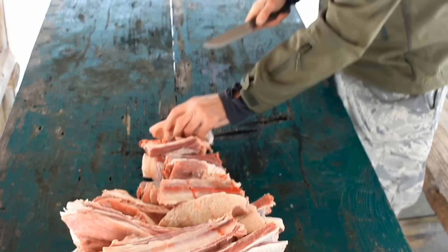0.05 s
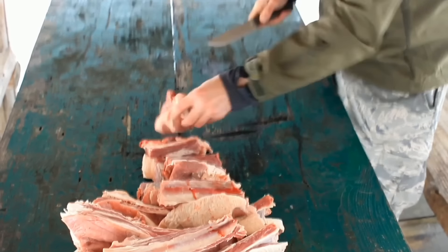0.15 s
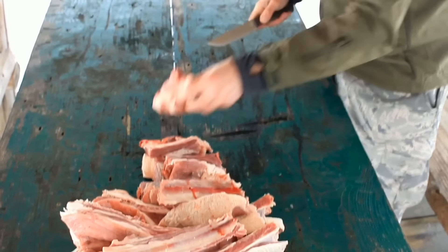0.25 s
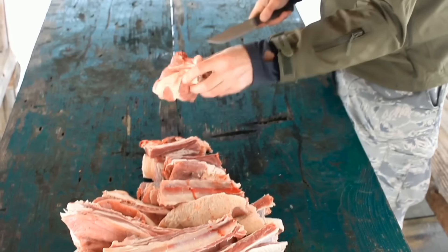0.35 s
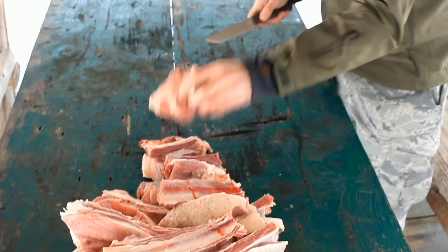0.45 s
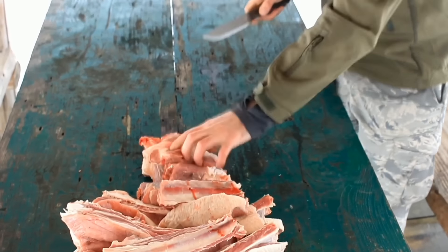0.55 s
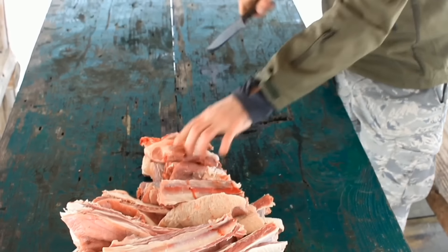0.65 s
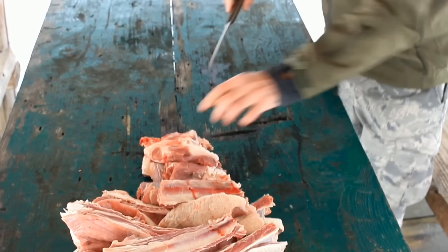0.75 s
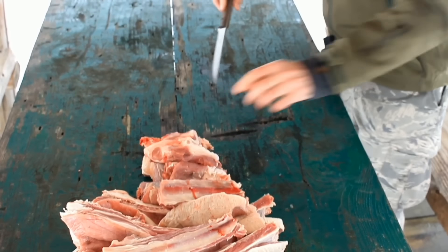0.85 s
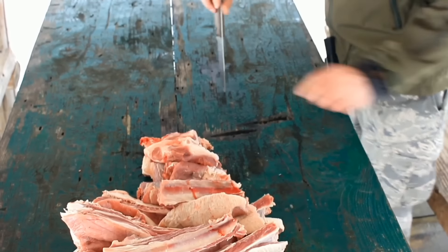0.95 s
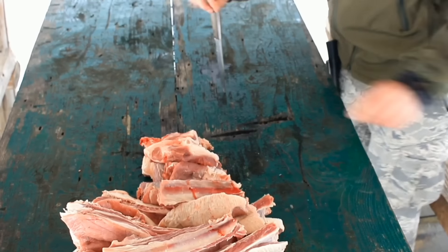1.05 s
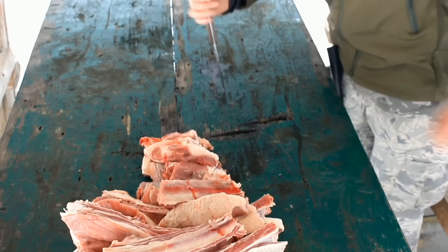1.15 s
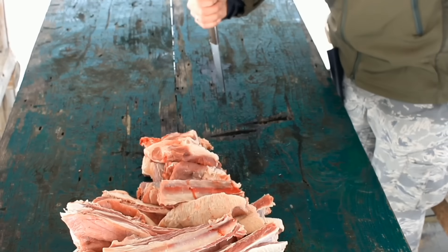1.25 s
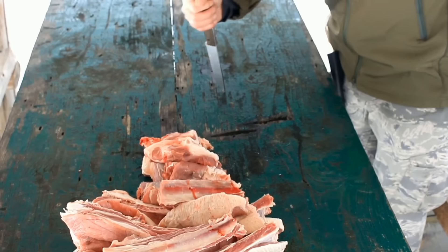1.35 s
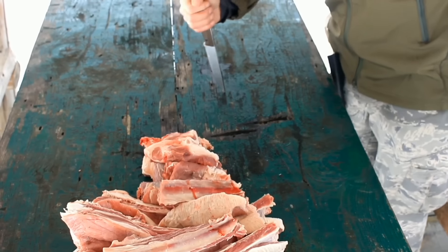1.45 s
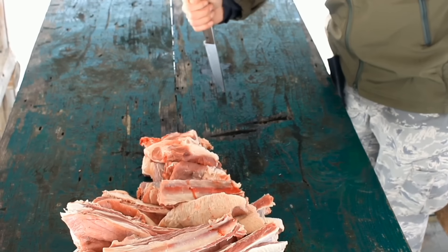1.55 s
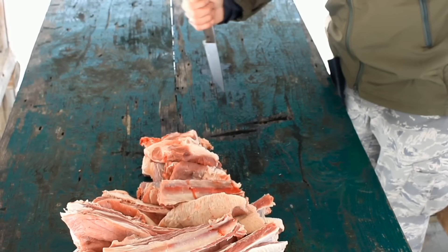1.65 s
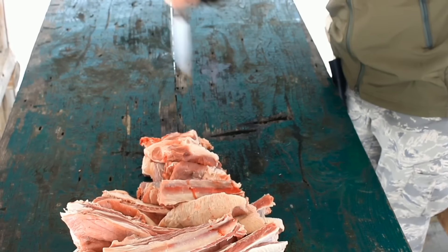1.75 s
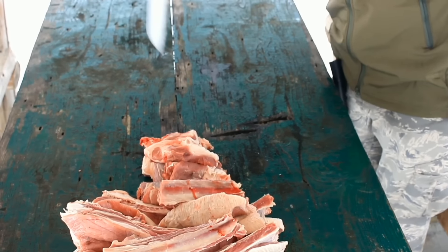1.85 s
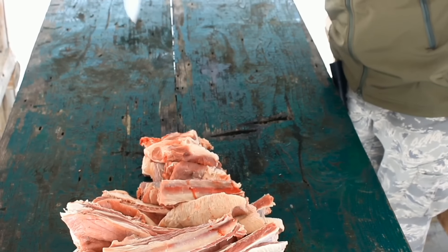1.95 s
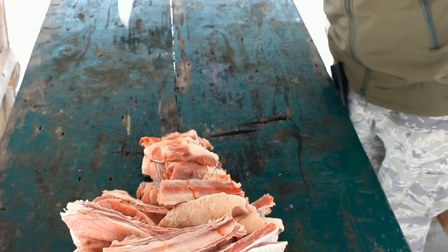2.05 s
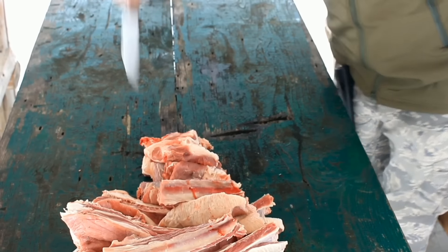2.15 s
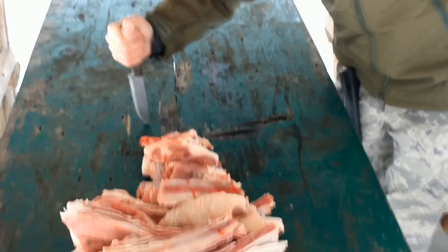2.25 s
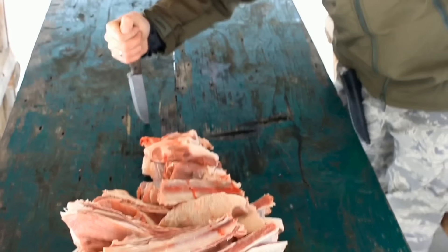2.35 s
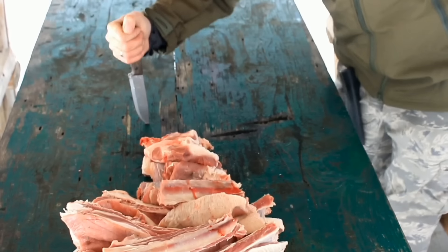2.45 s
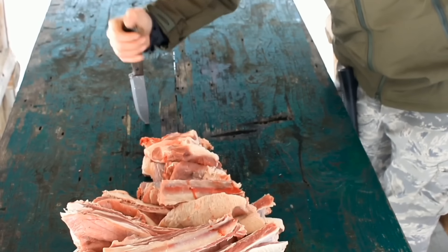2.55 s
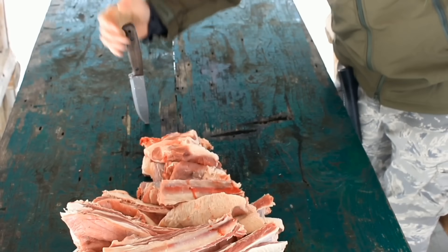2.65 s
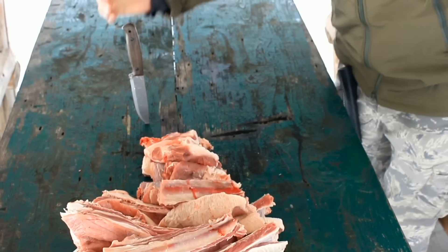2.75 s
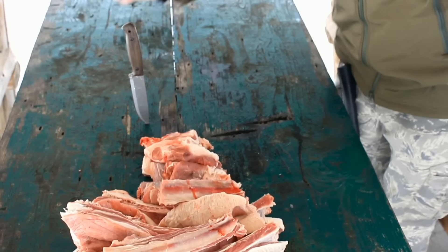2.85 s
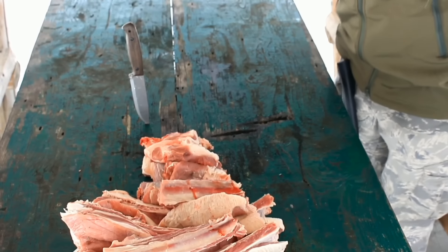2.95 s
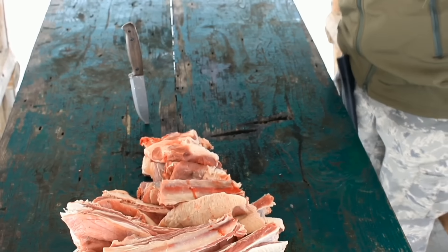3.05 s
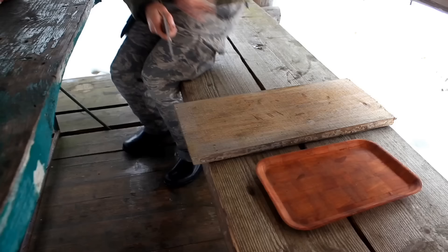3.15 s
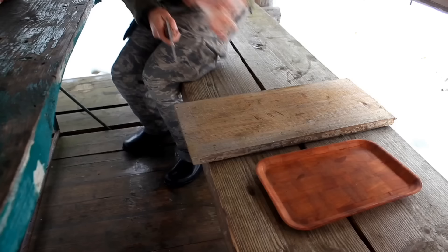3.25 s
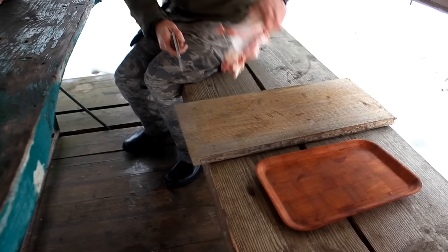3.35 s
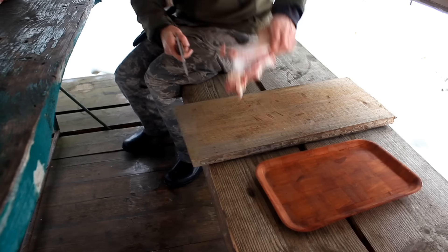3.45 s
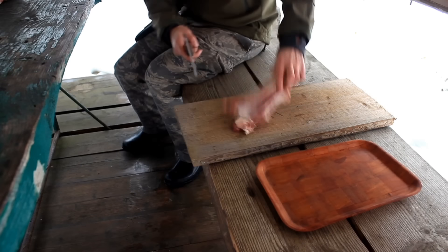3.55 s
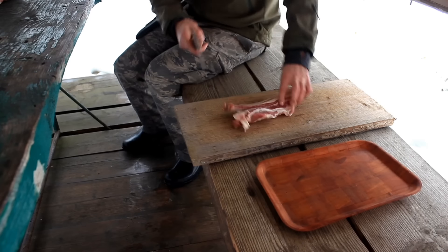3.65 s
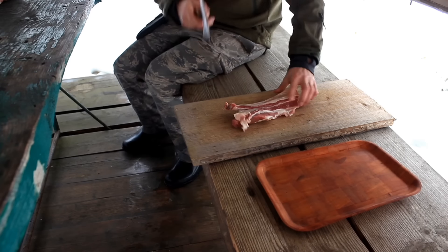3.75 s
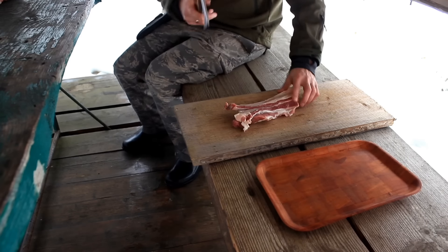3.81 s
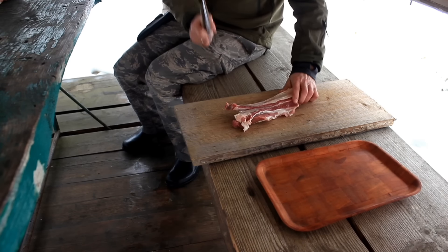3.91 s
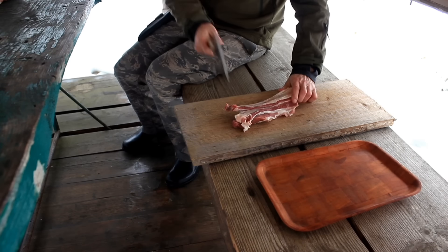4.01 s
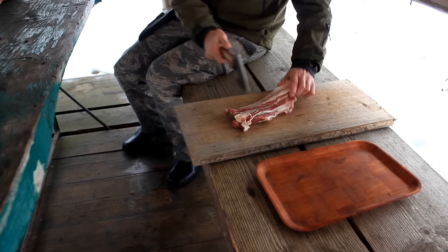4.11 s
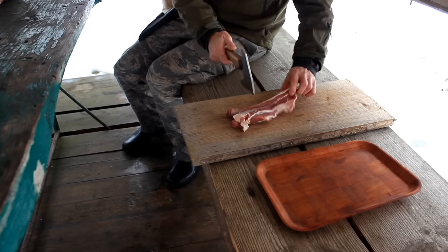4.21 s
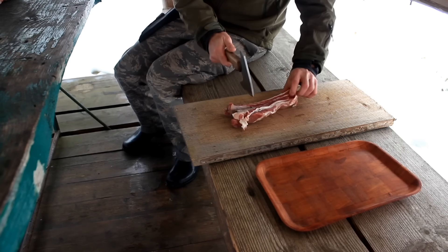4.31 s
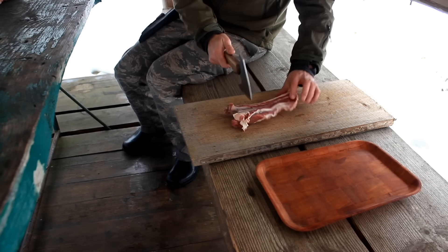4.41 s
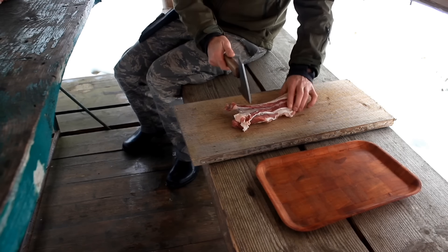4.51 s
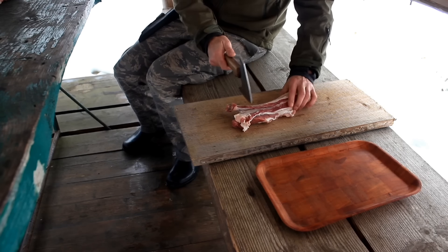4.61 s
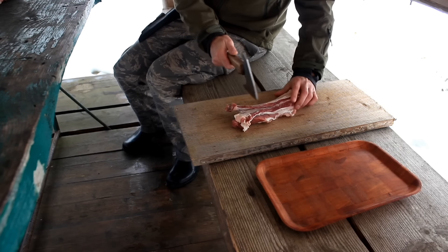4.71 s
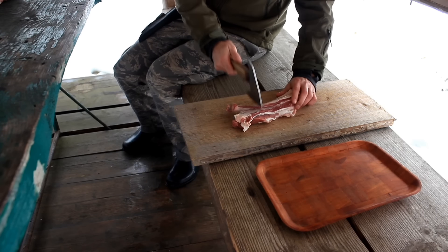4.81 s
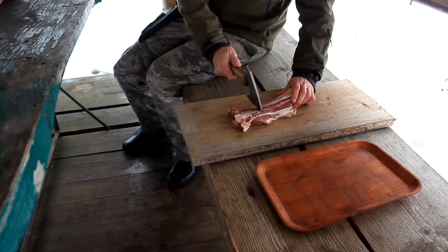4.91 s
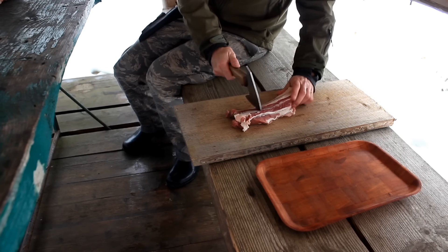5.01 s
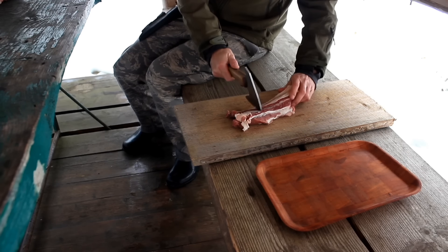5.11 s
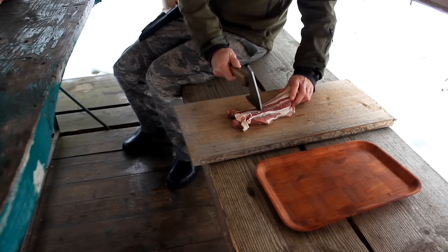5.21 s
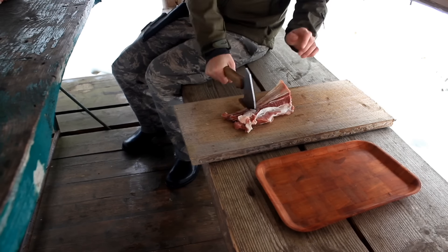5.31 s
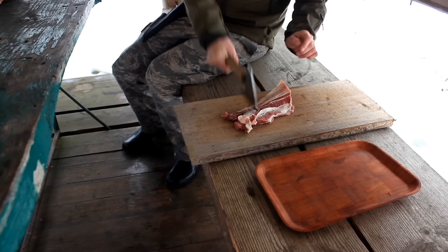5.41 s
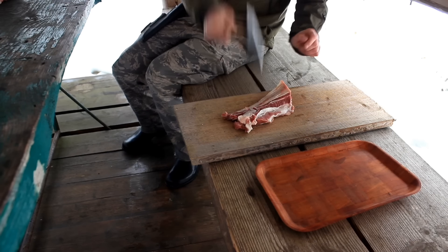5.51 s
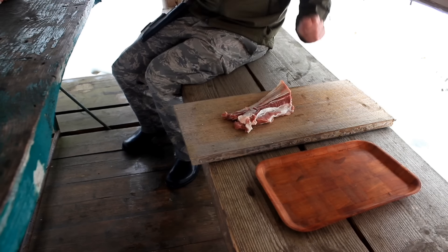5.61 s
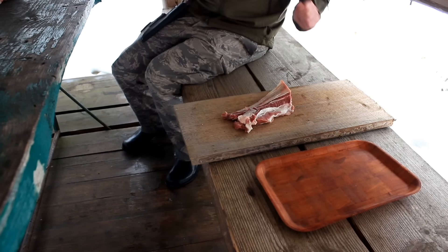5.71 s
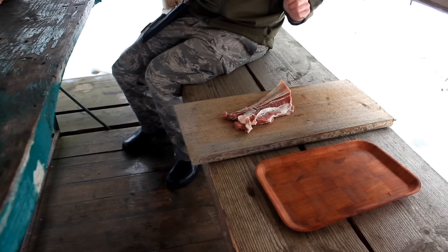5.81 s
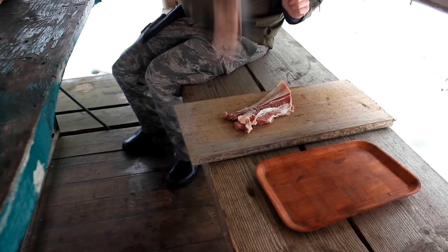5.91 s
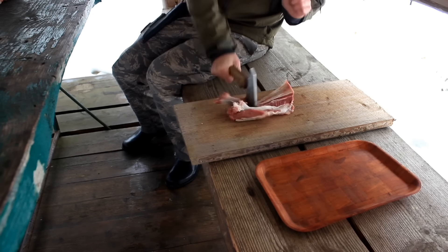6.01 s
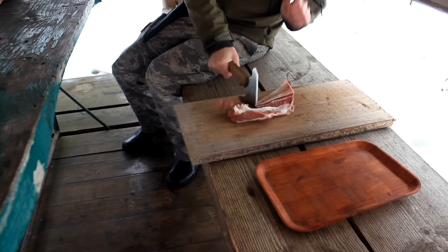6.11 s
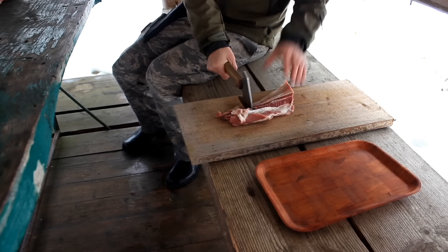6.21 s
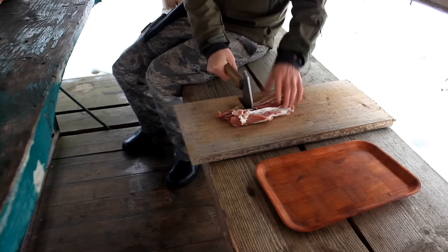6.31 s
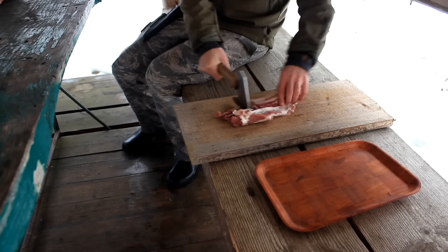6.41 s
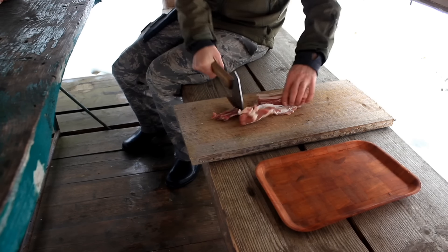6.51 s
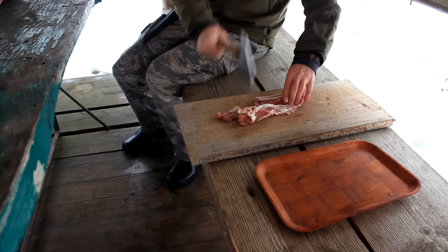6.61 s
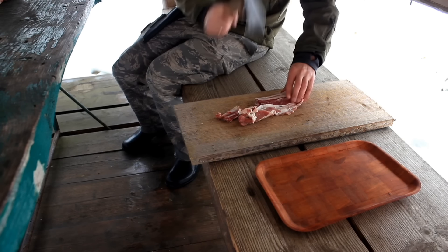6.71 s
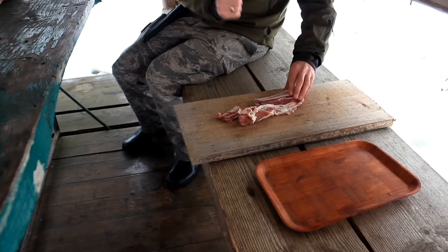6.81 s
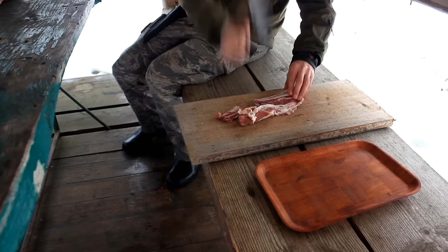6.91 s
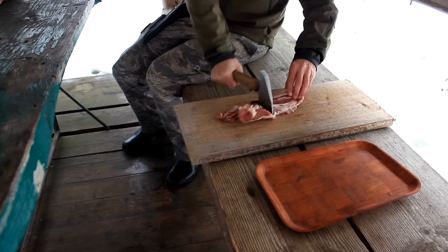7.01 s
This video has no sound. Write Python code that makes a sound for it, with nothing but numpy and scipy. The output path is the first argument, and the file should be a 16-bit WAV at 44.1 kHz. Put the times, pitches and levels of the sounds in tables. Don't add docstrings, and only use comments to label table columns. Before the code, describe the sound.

Close sounds in an open wooden shelter under soft rain. Meat drops and hand bumps thud through a plank table, then a knife stabs in with a heavy, low, woody bang and leaves a faint hum. The scene cuts to a quieter bench: wet meat slaps and slides on a board, and a hatchet delivers two sharp, distorted chops. The small microphone's hiss ducks after blows and creeps back.

```python
import sys
import numpy as np
from scipy import signal
from scipy.fft import rfft, irfft
from scipy.io import wavfile

SR = 44100
rng = np.random.default_rng(int(sys.argv[2]) if len(sys.argv) > 2 else 0)


def volts_from_decibels(level):
    exponent = np.asarray(level, float) / 20
    return 10 ** exponent


def digitize_waveform(pressure):
    field = np.atleast_2d(pressure).T
    bounded = np.clip(field, -1, 1)
    quanta = np.round(bounded * 32767).astype(np.int16)
    wavfile.write(sys.argv[1], SR, quanta)


N = 311346
T = np.arange(N) / SR
SLOW_T = T[::32]
BENCH_FROM_S = 3.15

# frequency in Hz, level in dB per Hz.
ROAR_COLOUR = [(120, -24), (200, -8), (330, -6), (550, -2.5), (860, -1.5), (1150, -3.5), (1450, -.2),
               (1750, -3.5), (2150, -6), (2650, -3.5), (3200, -10), (3900, -12), (4500, -22), (7000, -40)]
# frequency in Hz, level in dB per Hz.
PATTER_COLOUR = [(1500, -6), (3500, .2), (5000, -1.5), (6300, -.5), (8000, -5), (11000, -8.5), (15800, -12)]
# frequency in Hz, level in dB per Hz.
MICROPHONE_NOISE_COLOUR = [(50, 4.5), (400, 3.5), (800, -1.5), (1300, -11), (3500, -10), (5000, -2.5),
                           (7000, .2), (15800, .2)]
# level in dB, treble against level in dB.
RAIN_AT_TABLE, RAIN_AT_BENCH = (-30.3, -17.7), (-39.7, -13)
# start in seconds, level the hiss sinks to in dB, seconds it stays down.
HISS_SINKS = [
    (2.236, -44, .1),
    (5.232, -65.5, .16),
    (5.94, -66, .25),
    (6.96, -68, .13),
]
# middle in seconds, half length in seconds, level in dB,
# treble in dB.
RUSTLES = [(1.08, .15, .2, 1.5), (1.9, .3, 1.2, .1), (2.5, .05, 2.5, .1), (3.11, .08, -4, .3),
           (3.18, .06, 1.5, .5), (3.4, .15, 1.5, 3), (3.98, .14, 1.8, -.5), (5.72, .3, .1, 3.5),
           (6.3, .3, .1, -1.8), (6.86, .15, 3, 1.5)]
# deep in dB, upper in dB.
TREMOR_AT_TABLE, TREMOR_AT_BENCH = (-60, -55), (-64, -61)
# start in seconds, deep level in dB, upper level in dB,
# length in seconds, decay in dB per second.
SHAKES = [(0, -31, -35, .22, 70), (.52, -36, -38, .17, 35), (.88, -37, -40, .2, 90),
          (1.7, -52, -54, .1, 70), (2.45, -42, -47, .35, 30), (3.15, -45, -58, .18, 60),
          (3.62, -55, -51, .16, 45), (4.65, -57, -57, .2, 25), (5.1, -60, -58, .1, 30),
          (5.22, -58, -47, .06, 80), (5.98, -57, -44, .12, 60)]
# start in seconds, peak in dB.
DROPS = [(.4933, -32), (.9642, -32), (1.2431, -31), (1.4706, -29), (1.9081, -24), (2.4843, -41),
         (2.6449, -34), (2.7192, -36), (3.1707, -33), (3.2595, -31), (3.5488, -31), (3.5987, -33),
         (3.9599, -30), (4.0457, -30), (4.1385, -32), (4.5296, -35), (4.6374, -34), (4.7037, -33),
         (4.9322, -34), (5.4954, -50), (5.7633, -43), (5.8002, -46), (5.8471, -44), (6.3394, -59),
         (6.4133, -57), (6.5994, -50), (6.761, -46), (6.8613, -32), (6.8932, -37)]
# start in seconds, peak
# in dB, frequency in Hz, rise in seconds.
PUSHES = [(.005, -24, 33, .015), (.0, -29, 110, .03), (.14, -20, 110, .012), (.15, -23, 36, .02),
          (.53, -14, 38, .035), (.525, -25, 100, .015), (.53, -32, 260, .005), (.87, -33, 180, .02),
          (.92, -14, 110, .04), (.935, -27, 230, .02), (2.245, -12, 75, .02), (2.3, -33, 175, .04),
          (3.46, -38, 150, .04), (3.03, -42, 125, .04), (5.935, -20, 175, .012)]
# frequency in Hz, time to fall 60 dB in seconds.
PLANK_DECAY = [(35, .2), (75, .32), (110, .12), (178, .2), (245, .09)]
# start in seconds, peak in dB, frequency in Hz,
# rise in seconds, time to fall 60 dB in seconds.
KNIFE_HUM = [
    (2.46, -36, 77, .28, 1.8),
    (2.47, -30, 34, .16, 1.1),
]
# frequency in Hz, level in dB, rise in seconds, time to fall 60 dB in seconds.
BENCH_MODES = [(81, -1, .05, .5), (139, -2.5, .02, .17), (244, .5, .025, .2), (441, -.5, .015, .22)]
# start in seconds, peak in dB, Hz favoured by the spot.
KNOCKS = [(3.552, -26, 200), (3.66, -39, 75), (5.228, -35, 160), (5.25, -39, 75), (5.965, -26, 320),
          (5.97, -33, 75), (6.015, -28, 280), (6.09, -40, 90), (6.985, -28, 240)]
# start in seconds, level in dB, centre in Hz.
RUMBLE = (1.8, .9), [(.0, -38, 160), (2.3, -38, 160), (3.5, -45, 170), (3.86, -48, 200), (5.25, -56, 200),
          (6.05, -49, 260)]
MEAT_SLAP = (2.6, .16), [(3.439, -23, 800), (3.558, -31, 600), (3.582, -30, 600), (3.884, -33, 800),
             (5.23, -44, 600), (6.03, -40, 600)]
WET_SQUEAK = (.12, .06), [(.926, -36, 5500), (.93, -33, 4000), (1.153, -33, 4400), (4.703, -38, 5800),
              (7.015, -48, 5300)]
MEAT_SLIDE = (.2, .9), [(3.884, -39, 1250), (3.9, -44, 580), (4.01, -40, 1280), (4.09, -39, 1360)]
BOARD_BOUNCE = (1.8, .12), [(3.848, -33, 800), (5.226, -38, 1300), (6.0, -29, 1500), (6.06, -38, 1300),
                (6.966, -14, 1000), (7.012, -30, 1300), (7.053, -29, 1300)]
BOARD_BUZZ = (.3, .25), [(5.54, -58, 540), (5.562, -57, 1450), (5.575, -56, 800), (6.0, -37, 1100),
              (6.02, -46, 2150), (6.065, -45, 1400)]
BLADE_CRACK = (3.8, .02), [(2.231, -10, 2400), (5.9268, -14, 6000), (6.947, -15, 5000)]
BLADE_THUD = (1.4, .11), [(2.231, -5, 520), (5.94, -11, 380), (6.9475, -14, 600)]
# frequency in Hz, level in dB, time to fall 60 dB in seconds.
TABLE_MODES = [(37.7, -11, 0.7), (113, 0, 0.17), (226, -10, 0.14), (275, -11, 0.21), (415, -9, 0.12),
               (463, -13, 0.15), (565, -20, 0.2), (608, -20, 0.17), (684, -11, 0.14), (872, -22, 0.17),
               (969, -40, 0.41), (1427, -43, 0.19), (1631, -38, 0.26)]
BOARD_END_MODES = [(237, -16, .22), (447, -18, .3), (716, -11, .21), (910, -5, .14), (1001, -2.5, .11),
                   (1087, -8, .2), (1130, -9, .24), (1200, -.5, .13), (1303, -4, .17), (1427, -1.5, .11),
                   (1776, -11, .2), (1990, -9, .12), (2290, -14, .12), (2541, -13, .08), (2729, -17, .12),
                   (3200, -18, .08)]
BOARD_MIDDLE_MODES = [(86.1, -30, 5.0), (242, -15, 0.21), (474, -5, 0.083), (603, -14, 0.18), (678, 0, 0.1),
                      (877, 0, 0.073), (1001, -6, 0.09), (1141, -9, 0.1), (1314, -17, 0.13),
                      (1437, -18, 0.17), (1647, -13, 0.1), (2175, -21, 0.1), (2708, -27, 0.13),
                      (2848, -31, 0.13), (3381, -35, 0.14), (3790, -30, 0.077)]
# start in seconds, strength in dB, first shock in dB, seconds the shock takes to die,
# seconds the gain holds, dB by which it then sinks.
STAB = (2.231, -3, 2.5, .008, .024, 1.5)
FIRST_CHOP = (5.9286, -8, 24, .014, .0165, 8)
SECOND_CHOP = (6.9497, -7.5, 30, .016, .035, 4)


def rms_one(x):
    return x / np.sqrt(np.mean(x ** 2) + 1e-20)


def at_hz(points, hz):
    points = np.array(points)
    return np.interp(np.log(hz), np.log(points[:, 0]), points[:, 1])


def lowpass(x, order, hz):
    return signal.sosfilt(signal.butter(order, hz, fs=SR, output="sos"), x)


def band(x, low_hz, high_hz):
    edges = [low_hz, min(high_hz, .45 * SR)]
    return signal.sosfilt(signal.butter(2, edges, "band", fs=SR, output="sos"), x)


def drift(rate_hz):
    r = np.exp(-80 * np.pi * rate_hz / SR)
    white = rng.standard_normal(N // 40 + 2002)
    slow = signal.lfilter([1], [1, -2 * r, r * r], white)[2000:]
    return np.interp(np.arange(N) / 40, np.arange(len(slow)), rms_one(slow))


def ring(clicks, hz, t60):
    r = volts_from_decibels(-60 / (max(t60, 1e-4) * SR))
    w = 2 * np.pi * hz / SR
    return signal.lfilter([0, np.sin(w)], [1, -2 * r * np.cos(w), r * r], clicks + 1e-18)


def add(out, s, piece):
    at = round(s * SR)
    out[at:at + len(piece)] += piece[:N - at]


def by_place(at_table, at_bench):
    return [np.where(SLOW_T < BENCH_FROM_S, a, b) for a, b in zip(at_table, at_bench)]


def colour(x, spectrum):
    hz = np.maximum(np.fft.rfftfreq(N, 1 / SR), 1)
    return irfft(rfft(x) * volts_from_decibels(at_hz(spectrum, hz)), N)


def patchy_noise(spectrum, low_hz, patchy_db, grain_db):
    out = 0
    shared_db = patchy_db * drift(9.0) + grain_db * drift(150.0)
    noise = colour(rng.standard_normal((2, N)), spectrum)
    edges = low_hz * 2 ** np.arange(0, np.log2(SR / 2 / low_hz), .5)
    for k, (low, high) in enumerate(zip(edges, edges[1:])):
        flicker_db = shared_db + patchy_db * drift(14.0)
        out = out + volts_from_decibels(flicker_db) * band(noise[k % 2], low, high)
    return rms_one(out)


def rain_levels():
    fall_s, recovers_db_per_s = .014, 29
    treble_share, treble_back_s = .5, .07
    level_db, treble_db = by_place(RAIN_AT_TABLE, RAIN_AT_BENCH)
    for s, low_db, down in HISS_SINKS:
        since = SLOW_T - s
        fallen = np.clip(since / fall_s + .5, 0, 1)
        recovered_db = recovers_db_per_s * np.maximum(since - down, 0)
        lost_db = fallen * np.maximum(level_db - low_db - recovered_db, 0)
        treble_fade = fallen * np.exp(-np.maximum(since, 0) / treble_back_s)
        treble_db = treble_db - treble_share * lost_db.max() * treble_fade
        level_db = level_db - lost_db
    for s, half, swell_db, bright_db in RUSTLES:
        shape = np.exp(-((SLOW_T - s) / half) ** 2)
        level_db = level_db + swell_db * shape
        treble_db = treble_db + bright_db * shape
    return np.interp(T, SLOW_T, level_db), np.interp(T, SLOW_T, treble_db)


def rain_and_hiss():
    level_db, treble_db = rain_levels()
    at_table = T < BENCH_FROM_S
    roar = patchy_noise(ROAR_COLOUR, low_hz=100, patchy_db=.7, grain_db=.4)
    patter = patchy_noise(PATTER_COLOUR, low_hz=1200, patchy_db=.7, grain_db=1.1)
    farther = volts_from_decibels(2.2) * lowpass(patter, 1, 6500)
    patter = np.where(at_table, farther, patter)
    own_db = level_db + treble_db + np.where(at_table, -13, -8.5)
    own = volts_from_decibels(own_db) * rms_one(colour(rng.standard_normal(N), MICROPHONE_NOISE_COLOUR))
    rain = volts_from_decibels(level_db + .8) * roar + volts_from_decibels(level_db + treble_db + 3.2) * patter
    return rain + own * [[1], [-1]]


def plank_levels():
    rise_db_per_s = 400
    gains = [volts_from_decibels(db) for db in by_place(TREMOR_AT_TABLE, TREMOR_AT_BENCH)]
    for s, *peaks_db, lasts, dies in SHAKES:
        before, after = np.maximum(s - SLOW_T, 0), np.maximum(SLOW_T - s - lasts, 0)
        under_db = rise_db_per_s * before + dies * after
        gains = [np.hypot(gain, volts_from_decibels(db - under_db)) for gain, db in zip(gains, peaks_db)]
    return [np.interp(T, SLOW_T, 20 * np.log10(gain)) for gain in gains]


def plank_tremor():
    deep_db, upper_db = plank_levels()
    white = rng.standard_normal((2, N))
    deep = band(white[0], 20, 55) + volts_from_decibels(-62) * ring(white[0], 35, .5)
    upper = band(band(white[1], 55, 120), 50, 130) + volts_from_decibels(-60) * ring(white[1], 80, .4)
    floor = volts_from_decibels(-65) * rms_one(band(white[0], 130, 400))
    return floor + volts_from_decibels(deep_db + .2) * rms_one(deep) + volts_from_decibels(upper_db - 1.5) * rms_one(upper)


def drops():
    out, t = np.zeros(N), T[:400]
    for s, db in DROPS:
        hz = 6600 * 2 ** (.2 * rng.standard_normal())
        noise = rng.standard_normal(len(t)) * volts_from_decibels(-60 * t / .006)
        click = band(noise, hz / 1.6, hz * 1.6)
        add(out, s, volts_from_decibels(db + .5) * click / np.abs(click).max())
    return out


def mode_swells(rows):
    out, t = np.zeros(N), T[:SR * 2 // 3]
    for s, db, hz, rise, t60 in rows:
        swell = np.sin(np.pi / 2 * np.minimum(t / rise, 1)) ** 2
        decay = volts_from_decibels(db - 60 * np.maximum(t - rise, 0) / t60)
        add(out, s, decay * swell * np.sin(2 * np.pi * hz * t))
    return out


def plank_pushes():
    return mode_swells([(s, db, hz, rise, at_hz(PLANK_DECAY, hz)) for s, db, hz, rise in PUSHES])


def bench_knocks():
    rows = []
    for s, db, spot_hz in KNOCKS:
        for hz, mode_db, rise, t60 in BENCH_MODES:
            off_spot_db = 7 * abs(np.log2(hz / spot_hz))
            rows.append((s, db + mode_db - off_spot_db, hz, rise, t60))
    return mode_swells(rows)


def noise_bursts(kind):
    (octaves, t60), rows = kind
    out, t = np.zeros(N), T[:SR // 2]
    fade = np.minimum(t / .0015, 1) * np.minimum((.5 - t) / .1, 1)
    for s, db, hz in rows:
        low, high = hz / 2 ** (octaves / 2), hz * 2 ** (octaves / 2)
        noise = rng.standard_normal(len(t))
        burst = rms_one(band(band(noise, low, high), low, high))
        add(out, s, volts_from_decibels(db - 60 * t / t60) * fade * burst)
    return out


def wet_meat():
    return noise_bursts(MEAT_SLAP) + noise_bursts(WET_SQUEAK) + noise_bursts(MEAT_SLIDE)


def loose_wood():
    return noise_bursts(BOARD_BOUNCE) + noise_bursts(BOARD_BUZZ) + noise_bursts(RUMBLE)


def blade_entry():
    return noise_bursts(BLADE_CRACK) + noise_bursts(BLADE_THUD)


def shelter_tail(t, tail_db, tail_hz, tail_t60):
    noise, tail = rng.standard_normal((2, len(t))), 0
    for k, hz in enumerate(125 * 2. ** np.arange(7)):
        t60 = tail_t60 * (1000 / hz) ** .35
        share = 1 / np.sqrt((tail_hz / hz) ** 3.8 + 1 + (hz / tail_hz) ** 5.2)
        octave = rms_one(band(noise[k % 2], hz / 2 ** .5, hz * 2 ** .5))
        tail = tail + share * volts_from_decibels(tail_db - 60 * t / t60) * octave
    return tail


def blow(event, modes, contact, longest, **tail):
    s, db, shock_db, shock, hold, sink_db = event
    out, t = np.zeros(N), T[:SR // 2]
    wood = 0
    for hz, level_db, t60 in modes:
        crunch = rng.standard_normal(len(t)) * np.exp(-t / contact)
        mode = ring(crunch, hz, min(t60, longest))
        wood = wood + volts_from_decibels(level_db) * mode / np.abs(mode).max()
    shock_db = shock_db * np.clip(1 - t / shock, 0, 1)
    sink_db = sink_db * (1 - np.clip((t - hold) / .003 + .5, 0, 1))
    level = volts_from_decibels(db + shock_db + sink_db) * np.minimum(t / contact, 1)
    add(out, s, level * (wood + shelter_tail(t, **tail)))
    return out


def knife_stab():
    stab = blow(STAB, TABLE_MODES, contact=.001, longest=.7, tail_db=-9, tail_hz=330, tail_t60=.15)
    return stab + mode_swells(KNIFE_HUM)


def hatchet_chops():
    first = blow(FIRST_CHOP, BOARD_END_MODES, contact=.0015, longest=.2,
                 tail_db=2.5, tail_hz=1300, tail_t60=.155)
    second = blow(SECOND_CHOP, BOARD_MIDDLE_MODES, contact=.004, longest=.3,
                  tail_db=3.5, tail_hz=1050, tail_t60=.17)
    return first + second


def scene():
    handling = plank_tremor() + drops() + plank_pushes() + bench_knocks()
    meat_and_board = wet_meat() + loose_wood()
    blades = blade_entry() + knife_stab() + hatchet_chops()
    return rain_and_hiss() + (handling + meat_and_board + blades)


def band_limit(x):
    return signal.sosfilt(signal.butter(12, 15660, fs=SR, output="sos"), x)


def record(dry):
    clipped = np.clip(dry, -1, 1)
    x = signal.sosfilt(signal.cheby2(10, 50, 16100, fs=SR, output="sos"), clipped)
    bass = lowpass(x, 2, 120)
    mix = x + volts_from_decibels(-31) * bass * [[-1], [1]]
    return band_limit(mix)


dry = scene()
out = record(dry)
digitize_waveform(out)
```